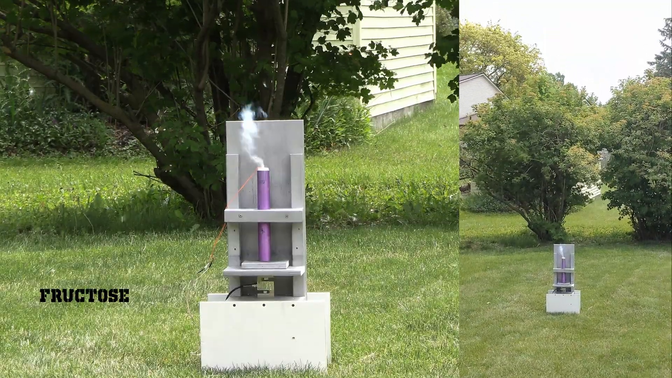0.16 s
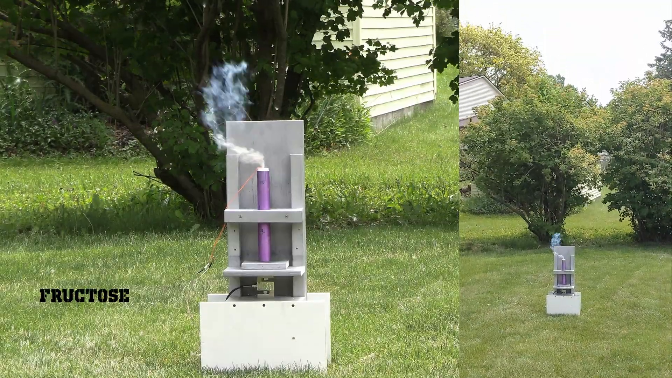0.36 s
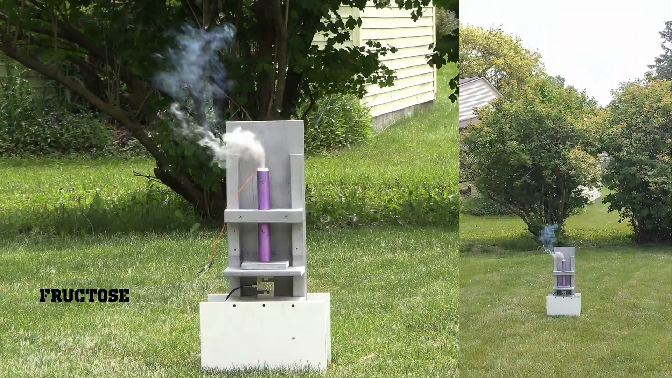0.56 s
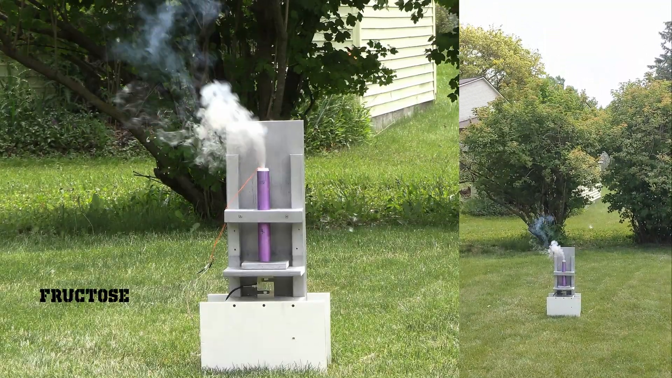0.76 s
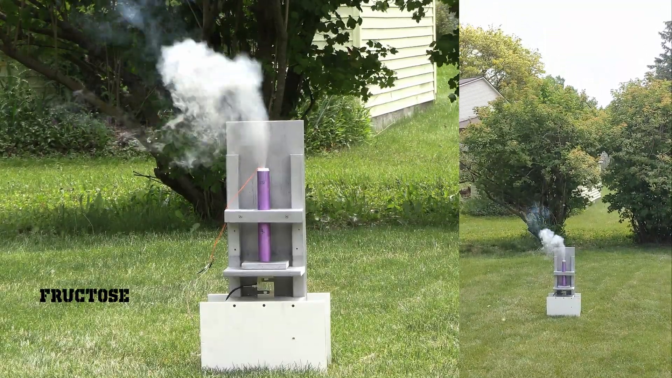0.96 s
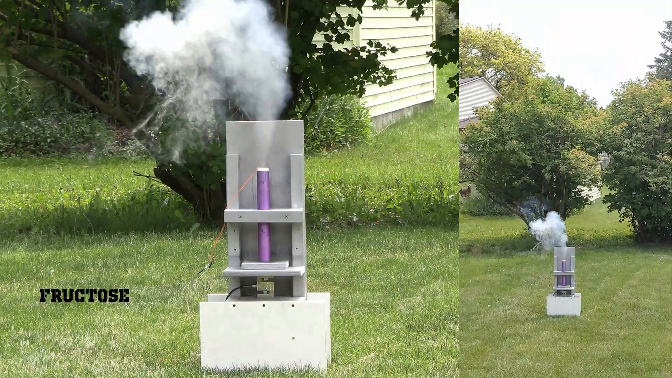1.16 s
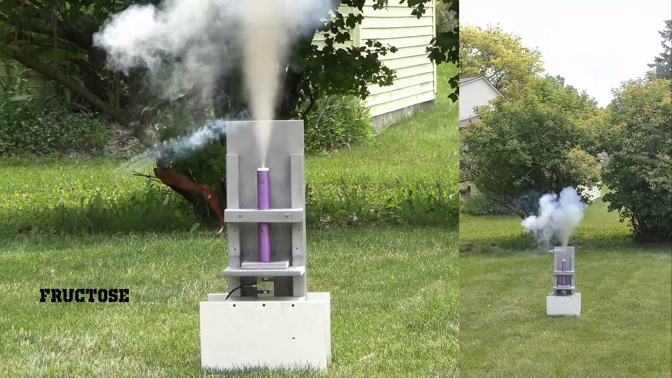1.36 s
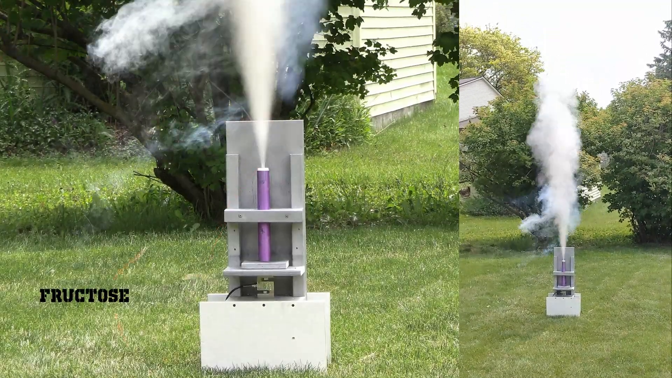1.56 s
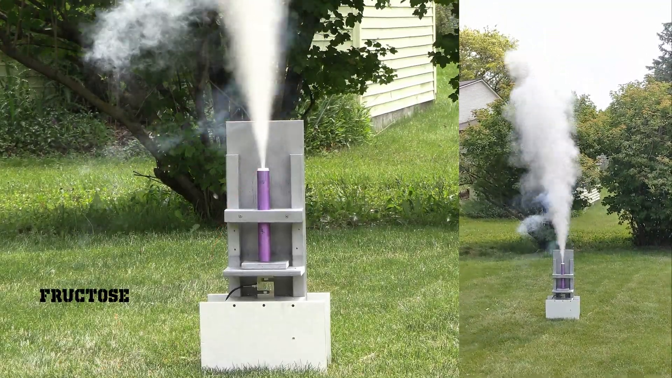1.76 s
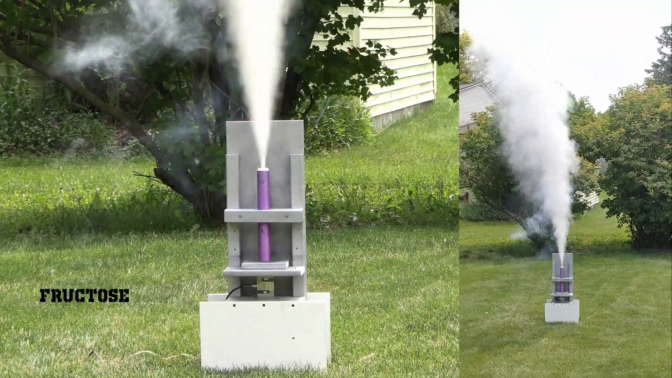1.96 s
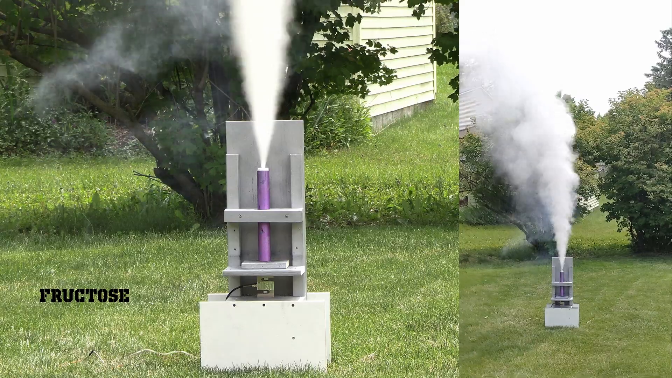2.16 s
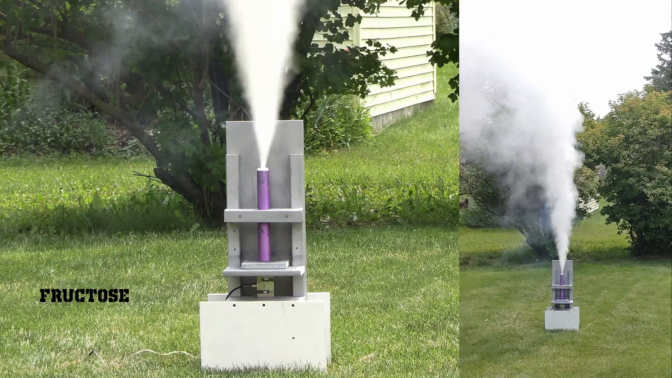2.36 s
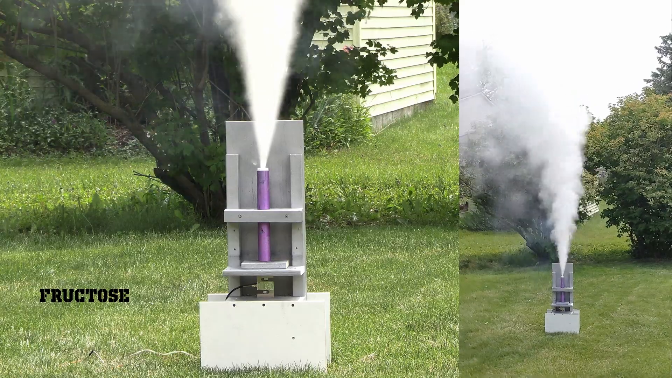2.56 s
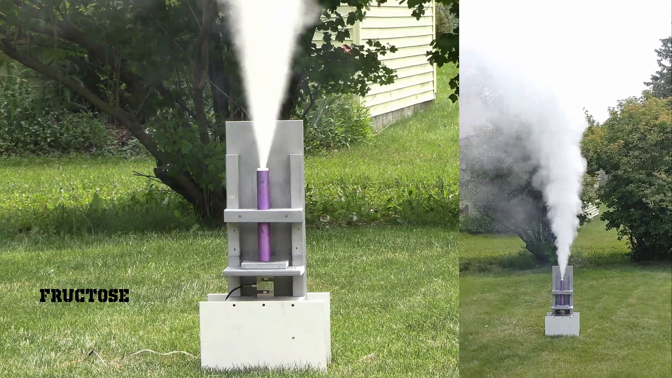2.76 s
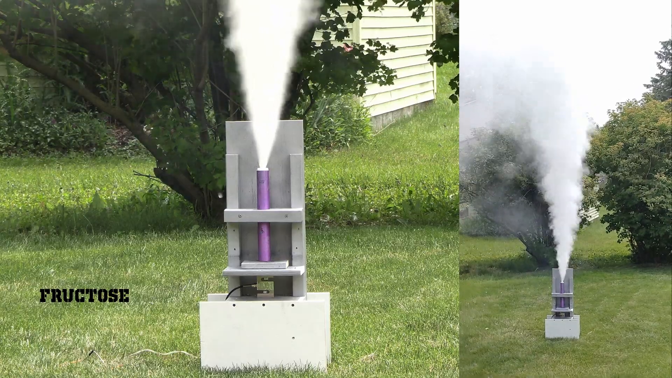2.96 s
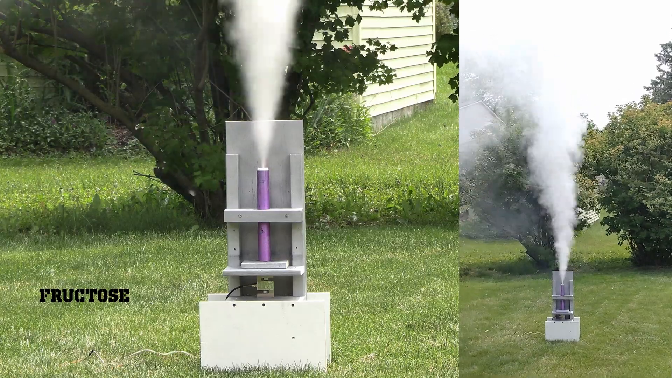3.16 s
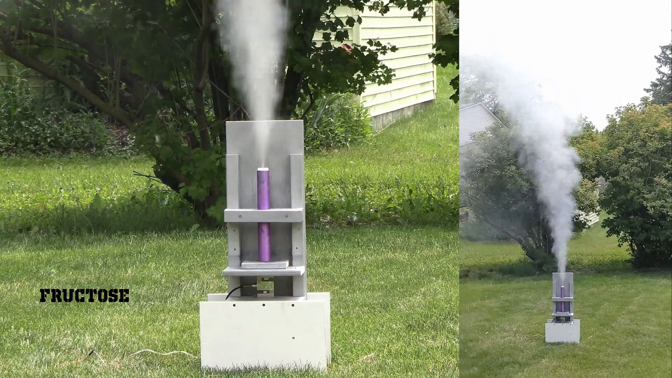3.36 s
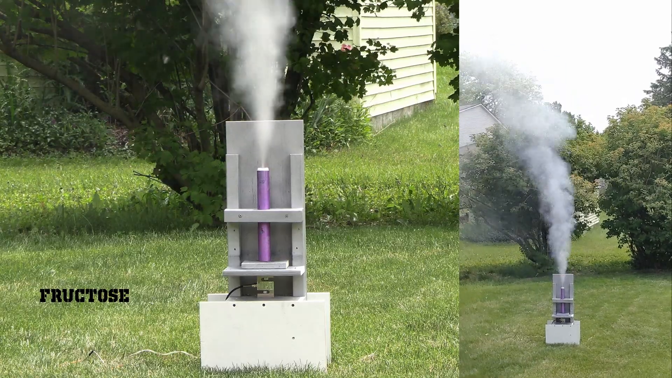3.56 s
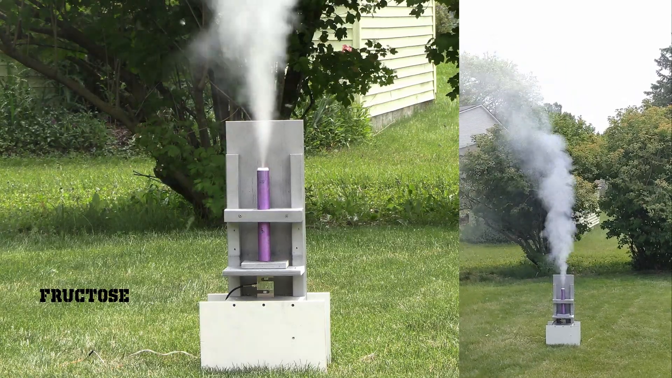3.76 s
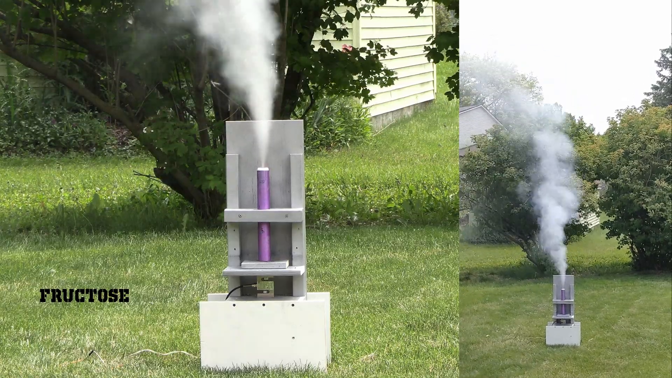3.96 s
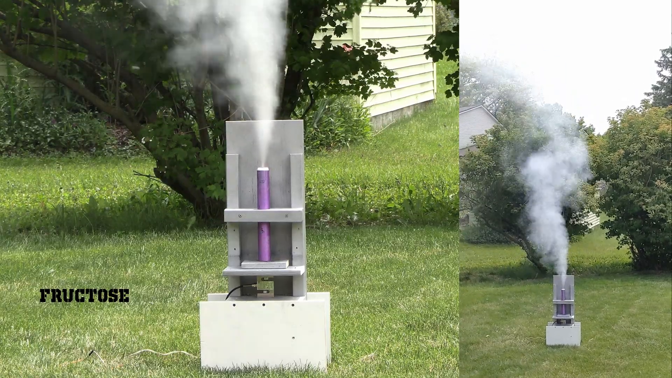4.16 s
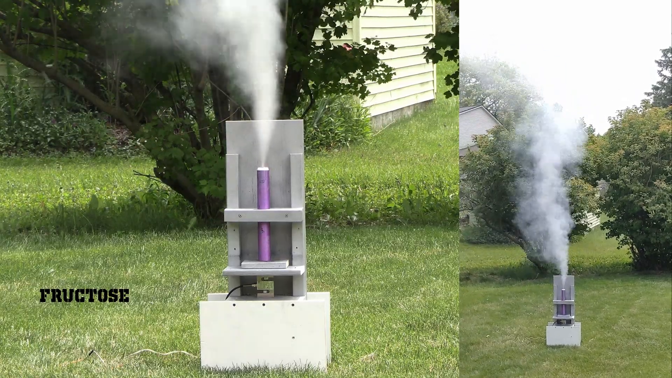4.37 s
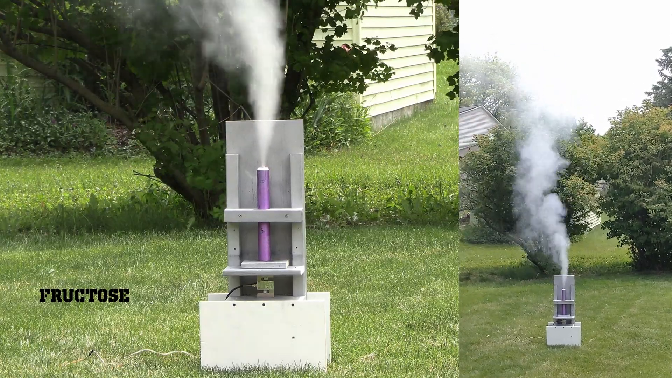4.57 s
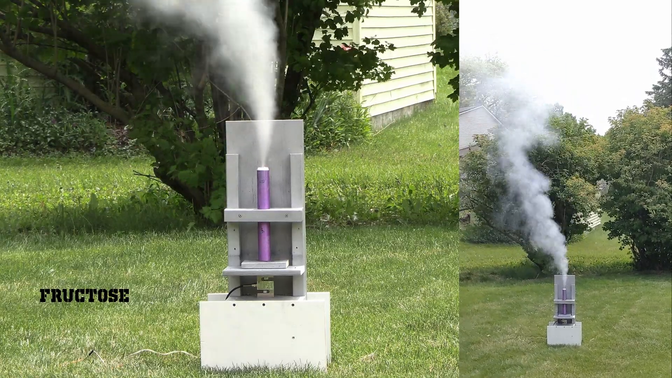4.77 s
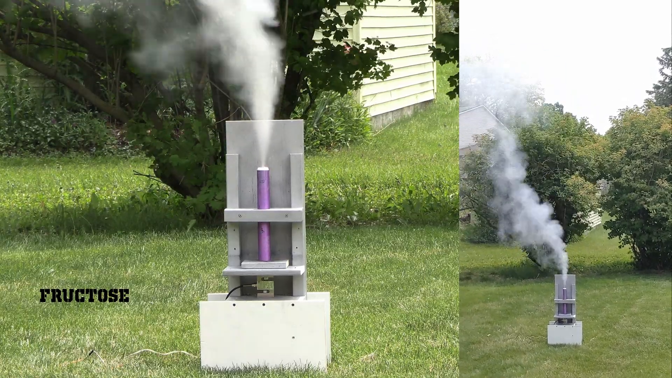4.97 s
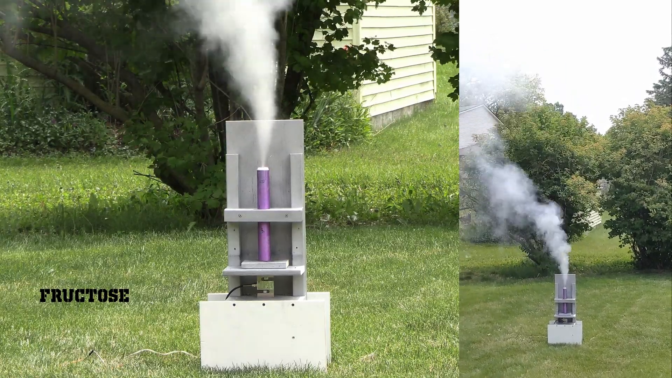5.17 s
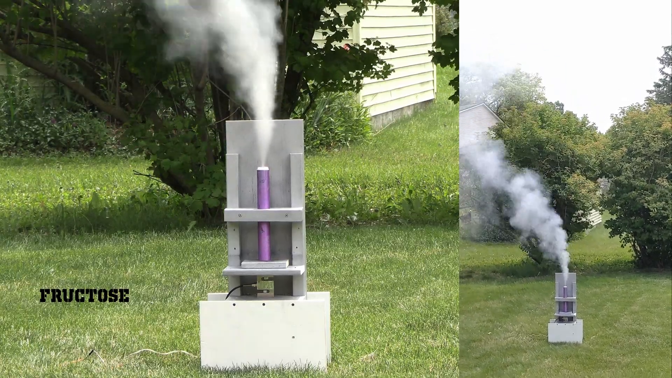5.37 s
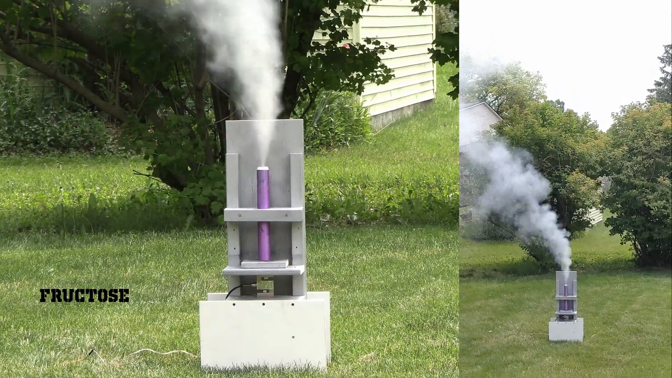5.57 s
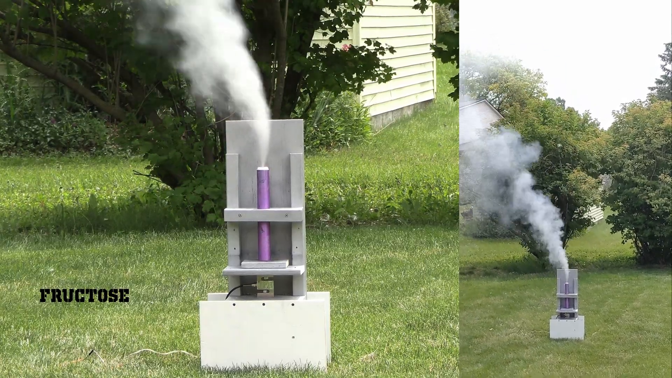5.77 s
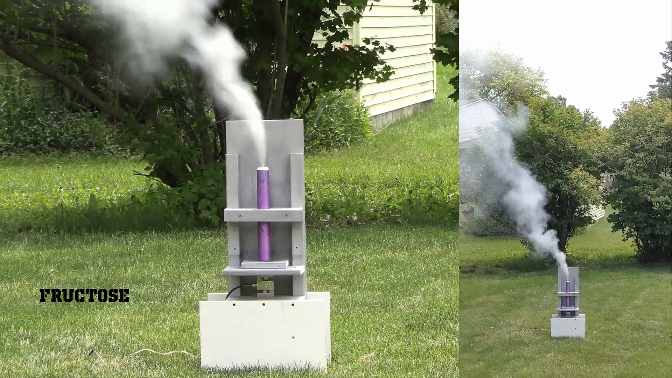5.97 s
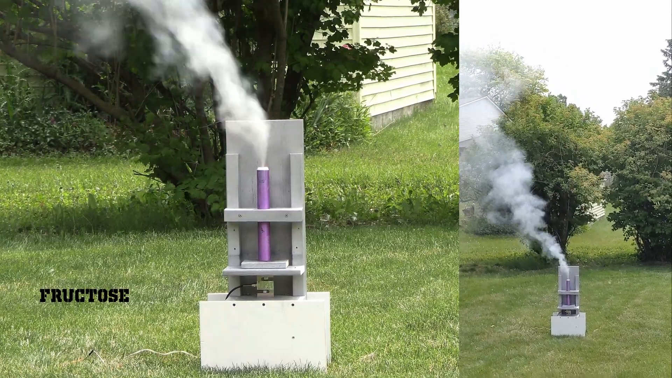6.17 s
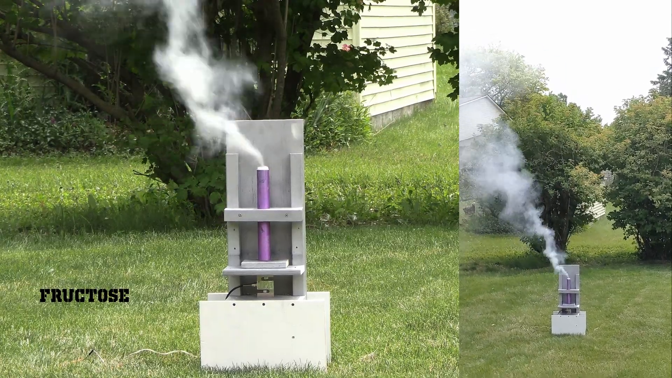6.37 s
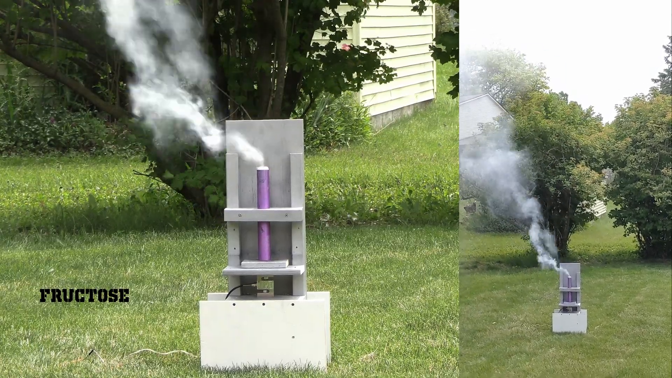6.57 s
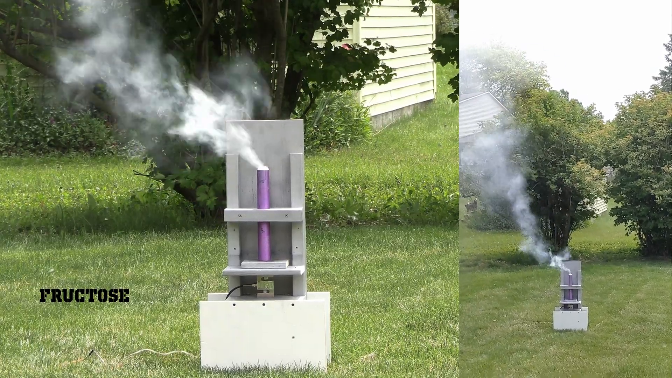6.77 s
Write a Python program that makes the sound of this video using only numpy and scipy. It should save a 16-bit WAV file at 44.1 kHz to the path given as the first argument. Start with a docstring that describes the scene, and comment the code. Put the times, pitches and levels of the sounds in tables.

```python
"""A small sugar rocket motor burns on a test stand on a lawn in a quiet garden, with wind on the microphone.
First the leaking gas fizzes and hoots: noise through resonances of the casing and the hollow core.
Then the nozzle chokes: white hiss, broadband jet roar and the sinking boom of the plume, for two seconds.
The pressure drains to a sputtering hiss with noise-burst spits and soft puffs of smoke.
The hiss dies away into gusts, the garden and a faint hum."""
import sys
import numpy as np
from scipy import signal
from scipy.fft import rfft, irfft
from scipy.io import wavfile
from scipy.ndimage import uniform_filter1d

SR = 44100
rng = np.random.default_rng(int(sys.argv[2]) if len(sys.argv) > 2 else 0)


def master(y):
    """Save y as 16-bit WAV."""
    cut = np.clip(np.atleast_2d(y).T, -1, 1)
    pcm = np.round(cut * 32767)  # scale
    wavfile.write(sys.argv[1], SR, pcm.astype(np.int16))


N = 300762
TIME = np.arange(N) / SR
# times and frequencies of the short-time spectra
FRAME_S = np.arange(N // 256 + 5) * 256 / SR
HZ = np.fft.rfftfreq(1024, 1 / SR)


def amp(db):
    """Level law: decibels to amplitude gain."""
    return 10 ** (np.asarray(db) / 20)


def evened(x):
    """Normalisation: scales to rms 1."""
    return x / np.sqrt(np.mean(x ** 2) + 1e-20)


def read(points, hz):
    """Spectral interpolation: a table read on a log-frequency axis."""
    table_hz, value = np.transpose(points)
    return np.interp(np.log(hz + 1), np.log(table_hz), value)


def track(rows, t):
    """Linear interpolation: the columns of a curve table at times t."""
    s, *columns = np.transpose(rows)
    return [np.interp(t, s, column) for column in columns]


def within(rows, fade=0.13):
    """Gating: 1 while a curve lasts, with Gaussian fades beyond its ends."""
    before = rows[0][0] - TIME
    after = TIME - rows[-1][0]
    outside = np.maximum(np.maximum(before, after), 0)
    return np.exp(-(outside / fade) ** 2)


def flutter(lo_hz, hi_hz):
    """Slow modulation: random wavering of rms 1 between two rates."""
    f = np.fft.rfftfreq(N, 1 / SR)
    band_gain = f / (f + lo_hz) / (1 + (f / hi_hz) ** 2)
    return evened(irfft(rfft(rng.standard_normal(N)) * band_gain, N))


def steady(colour):
    """Spectral shaping: stationary noise of rms 1 with a fixed spectrum."""
    gain = amp(read(colour, np.fft.rfftfreq(N, 1 / SR)))
    return evened(irfft(rfft(rng.standard_normal(N)) * gain, N))


def turbulence(shape, band, patchy_db):
    """Turbulence: noise with a moving spectrum and passing eddies, rms 1 inside the band."""
    re, im, eddies = rng.standard_normal((3, len(FRAME_S), len(HZ)))
    # an eddy spans neighbouring frames and frequencies
    eddies = uniform_filter1d(eddies, size=9, axis=0)
    eddies = evened(uniform_filter1d(eddies, size=16, axis=1))
    inside = (HZ >= band[0]) & (HZ <= band[1])
    level_shape = shape / np.linalg.norm(shape * inside, axis=1, keepdims=True)
    spectra = (re + 1j * im) * amp(patchy_db * eddies) * level_shape
    whole, part = (signal.istft(v.T, nperseg=1024, noverlap=768)[1][:N] for v in (spectra, spectra * inside))
    return whole / part.std()


def resonance(hz, width_hz):
    """Simple resonator: its gain at every frequency."""
    return 1 / np.sqrt(1 + ((HZ - hz ** 2 / (HZ + 1)) / width_hz) ** 2)


def bumps(modes, tuning=1):
    """Modal response: the sum of bell-shaped peaks and notches in dB."""
    return sum(db * np.exp(-((HZ - hz * tuning) / width) ** 2) for hz, width, db in modes)


def sing(hz, width_hz):
    """Noise-driven resonance: one gliding resonance of rms 1 inside 20-3000 Hz."""
    return turbulence(resonance(hz, width_hz) ** 2, band=(20, 3000), patchy_db=1.5)


def swells(rows, t):
    """Superposition: gain of Gaussian events, each with a centre_s, level_db and half_length_s."""
    return sum(amp(db) * np.exp(-((t - s) / length) ** 2) for s, db, length in rows)


def step(t, at, rise):
    """Sigmoid transition: a smooth step from 0 to 1."""
    return .5 + .5 * np.tanh(.5 * (t - at) / rise)


# spectrum of distant traffic and leaves: frequency_hz, density_db
GARDEN_COLOUR = [(20, -5), (60, -20), (110, -6), (180, -12.5), (480, -14.5), (650, -13.5), (1040, -13),
                 (1150, -18), (1760, -17.5), (2000, -22), (4400, -23), (6500, -26), (9000, -37.5),
                 (12000, -51), (15800, -49)]
# the faint, far-off hum: time_s, level_db, pitch_hz
HUM_TRACK = [(5.6, -68, 900), (6.2, -75, 950), (6.6, -67, 1030), (6.82, -71, 1030)]


def garden():
    """Stationary ambience: distant traffic and leaves rise slightly, and a narrow resonance hums far off."""
    hum_hz = track(HUM_TRACK, FRAME_S[:, None])[1]
    hum_gain = amp(track(HUM_TRACK, TIME)[0]) * within(HUM_TRACK, fade=.066)
    hum = sing(hum_hz, width_hz=80) * hum_gain
    ambience_db = np.interp(TIME, [1, 6], [-57, -55.3])
    return steady(GARDEN_COLOUR) * amp(ambience_db) + hum


# spectrum of wind buffeting the microphone: frequency_hz, density_db
BUFFET_COLOUR = [(10, -8), (25, 0.5), (42, 9.5), (65, -5.5), (105, -10), (160, -26.5), (260, -34),
                 (900, -65)]
# gusts on the microphone: centre_s, level_db, half_length_s
GUST_EVENTS = [(.1, -55, 0.34), (.455, -38.5, .022), (.59, -45, .07), (.74, -34, 0.045),
               (.87, -40.5, 0.053), (.965, -30, 0.012), (1.03, -39, .025), (1.11, -37.5, 0.021),
               (1.2, -45, 0.24), (5.42, -53, .11), (5.63, -51.5, 0.19), (6.27, -56.5, 0.17),
               (6.64, -49, 0.13)]
BREEZE_DB = -12  # the softer, higher flutter around each gust, against the smoothed gusts


def wind():
    """Pressure fluctuation: gusts buffet the microphone before and after the burn, amid a softer flutter."""
    gusts = swells(GUST_EVENTS, TIME)
    buffet = steady(BUFFET_COLOUR)
    # level the noise so that the gusts alone set its loudness
    local_rms = np.sqrt(uniform_filter1d(buffet ** 2, size=3000))
    breeze = steady([(20, -1), (60, -1), (100, 3), (140, -5.5), (250, -27), (900, -60)])
    return buffet / local_rms * gusts + breeze * amp(BREEZE_DB) * uniform_filter1d(gusts, size=16000)


# soft puffs of smoke as the grain burns out: centre_s, level_db, half_length_s
PUFF_EVENTS = [(3.61, -45, .025), (3.752, -44, 0.019), (4.05, -52.5, 0.017), (4.24, -48, 0.029),
               (4.475, -48, 0.022), (4.58, -46, 0.014), (4.647, -45, 0.013), (4.82, -41, .012),
               (4.855, -44, 0.021), (4.96, -46.5, .02), (5.09, -51, .03)]


def puffs():
    """Pulsed low-frequency noise: lumps of smoke leave the nozzle with a low flutter."""
    air = steady([(50, -20), (120, -7.5), (230, -1.5), (360, 3.5), (520, -7.5), (800, -1), (1500, -20),
                  (4000, -50)])
    return air * swells(PUFF_EVENTS, TIME)


# spits of the dying grain: start_s, level_db (before the envelope shape), decay_s
SPIT_EVENTS = [(3.396, -42, 0.0033), (3.407, -40, 0.004), (3.417, -41, .003), (5.523, -34, .004),
               (5.545, -26, 0.0045), (5.558, -37, .004), (5.591, -28, .006), (5.684, -35, .004)]


def spits():
    """Impulsive noise: bits of slag leave the nozzle as short puffs with a quick rise and decay."""
    puff = steady([(200, -32), (700, 1.5), (1400, -13), (2200, 8.0), (3000, 1.5), (4100, 8.0), (7000, -34),
                   (15000, -48)])
    envelope = np.zeros(N)
    for s, db, decay in SPIT_EVENTS:
        age = np.maximum(TIME - s, 0) / decay
        envelope += amp(db) * 2 * np.sqrt(age) * np.exp(-age)
    return puff * envelope


# the igniter spurts: centre_s, level_db, half_length_s
SPURT_EVENTS = [(0.0, -57, .03), (.058, -53.5, 0.032), (.162, -50.5, 0.03), (.225, -61.5, .06)]
# then the grain catches and leaks ever more gas, until the nozzle hiss takes over
LEAK_DB, LEAK_DB_PER_S, HANDOVER_S, HANDOVER_FADE_S = -66.5, 16, 1.21, 0.11  # LEAK_DB is at time 0


def leak(t):
    """Source strength: gain of the gas that escapes at ignition, in spurts and a growing stream."""
    stream = amp(LEAK_DB + LEAK_DB_PER_S * t) * (1 - step(t, HANDOVER_S, HANDOVER_FADE_S))
    return swells(SPURT_EVENTS, t) + stream


# the whistle of the casing at ignition: time_s, pitch_hz
WHISTLE_TRACK = [(0, 2170), (.12, 2240), (.19, 2450), (.26, 2190), (.42, 2070), (.62, 2210), (1.05, 2340)]
# spectrum of the gas that leaks out at ignition: frequency_hz, density_db
LEAK_COLOUR = [(500, -25), (1200, -9), (1900, 1), (3000, 0), (4500, -5), (6200, 4.5), (7200, -3),
               (8300, -3), (9500, -15), (11500, -21), (15800, -28)]
# peaks and notches of the nozzle and stand, before weighting: frequency_hz, width_hz, gain_db
STAND_MODES = [(4420, 150, -5), (4960, 260, 6), (6400, 300, 1.5), (7250, 260, -3), (8150, 520, 5.5),
               (10450, 450, 2.5), (12400, 300, 2.5), (13350, 280, -2.5), (14250, 450, 4.5)]


def fizz():
    """Pipe resonance and overblowing: the first gas sings in the casing, a stronger leak adds a second mode."""
    t = FRAME_S[:, None]
    pipe_hz, = track(WHISTLE_TRACK, t)
    overblow = np.minimum(leak(t) / amp(-51), 1)
    first_db = 18 / (1 + ((HZ - pipe_hz) / 150) ** 2)
    second_db = 12 * overblow / (1 + ((HZ - 1.62 * pipe_hz) / 160) ** 2)
    colour_db = read(LEAK_COLOUR, HZ) + first_db + second_db + 0.6 * bumps(STAND_MODES)
    return turbulence(amp(colour_db), band=(1900, 2700), patchy_db=2.0) * leak(TIME)


# the core rises as it warms: pitch at time 0 under a 2200 Hz whistle, its rise, level against the leak
HOOT_HZ, HOOT_HZ_PER_S, HOOT_DB = 520, 110, -5.5


def hoot():
    """Bottle resonance: the leak drives the hollow core, whose pitch bends with the whistle."""
    t = np.minimum(FRAME_S[:, None], CHOKE_S)
    bend = (track(WHISTLE_TRACK, t)[0] / 2200) ** 1.6
    core_hz = (HOOT_HZ + HOOT_HZ_PER_S * t) * bend
    return sing(core_hz, width_hz=170) * amp(HOOT_DB) * leak(TIME)


# burnout: when the pressure lets go, and its decay time
BURNOUT_S, DRAIN_S = 3.3, .13


def drained(t):
    """Exponential discharge: share of the pressure that is left after burnout."""
    return np.exp(-np.maximum(t - BURNOUT_S, 0) / DRAIN_S)


# the nozzle chokes quickly, then the pressure creeps up to full
CHOKE_S, CHOKE_RISE_S, CREEP_SHARE, CREEP_S = 1.39, 0.023, 0.21, 0.88
UNCHOKED_SHARE = 0.086  # the share of choked flow that never goes


def choked(t):
    """Choked flow: how fully the nozzle is choked, 0-1."""
    creep = 1 - CREEP_SHARE * np.exp(-np.maximum(t - CHOKE_S, 0) / CREEP_S)
    return np.clip(UNCHOKED_SHARE + 0.82 * step(t, CHOKE_S, CHOKE_RISE_S) * creep * drained(t), 0, 1)


# the boom of the smoke column: time and level of its peak, then the slopes before and after
PLUME_S, PLUME_DB, PLUME_RISE_DB_PER_S, PLUME_FALL_DB_PER_S = 1.455, -30.5, 120, 13
# its pitch at the peak, the pitch it sinks toward, and the time constant
PLUME_PEAK_HZ, PLUME_END_HZ, PLUME_SINK_S = 220, 70.4, 0.73


def plume_hz(t):
    """Length scaling: the taller the smoke column, the lower its largest eddies sound."""
    age = np.maximum(t, CHOKE_S) - PLUME_S
    return PLUME_END_HZ + (PLUME_PEAK_HZ - PLUME_END_HZ) * np.exp(-age / PLUME_SINK_S)


def plume():
    """Large-scale turbulence: the boom of the growing smoke column swells fast, then fades as it sinks."""
    centre_hz = plume_hz(FRAME_S[:, None])
    shape = resonance(centre_hz, width_hz=0.98 * centre_hz) ** 2
    boom = turbulence(shape, band=(20, 1000), patchy_db=2.0)
    age = TIME - PLUME_S
    swell_db = np.minimum(PLUME_RISE_DB_PER_S * age, -PLUME_FALL_DB_PER_S * age)
    return boom * drained(TIME) * amp(PLUME_DB + swell_db)


# gas flow through the nozzle: time_s, level_db (before trim and flutter)
FLOW_TRACK = [(0.85, -64), (0.86, -65.5), (1.19, -43), (1.25, -37), (1.37, -29), (1.99, -27.5),
              (2.4, -27.5), (3.07, -27), (3.35, -31), (3.6, -28.5), (3.85, -30), (4.37, -28.5), (5.12, -29),
              (5.59, -33), (6.17, -51.5), (6.4, -67.5)]
# spectrum of the soft hiss: frequency_hz, density_db
SOFT_COLOUR = [(300, -32), (1200, -14), (1700, -4.5), (2800, -1), (3400, 1), (4500, -2), (6500, -3),
               (7300, -7), (9500, -12.5), (12000, -18), (15800, -23)]
# spectrum of choked flow: frequency_hz, density_db
CHOKED_COLOUR = [(300, -75), (1500, 1), (2800, 1), (3600, 1), (4400, -2.5), (5500, 0.5), (7200, -4),
                 (9500, -3.5), (12000, -2), (15800, -2.5)]
# pipe resonances of the casing, before tuning and ringing: frequency_hz, width_hz, gain_db
PIPE_MODES = [(2248, 230, 8), (4110, 370, 3.5), (5740, 470, 2.5)]
# below this level the hiss is darker, and the casing's pitch sags by a share for every 20 dB
QUIET_HISS_DB, SAG_SHARE = -37, 0.053
# the casing rings most when nearly empty: factor on its dB, extra at the peak, peak time, half length
RING_REST, RING_EXTRA, RING_S, RING_LENGTH_S = 0.63, 1.45, 5.7, 0.7


def hiss():
    """Nozzle flow noise: slow gas rings the casing, choked gas damps the ringing and turns white."""
    t = FRAME_S[:, None]
    choke = choked(t)
    quiet_db = np.maximum(QUIET_HISS_DB - track(FLOW_TRACK, t)[0], 0)
    ringing = RING_REST + RING_EXTRA * np.exp(-((t - RING_S) / RING_LENGTH_S) ** 2)
    tuning = .99 - SAG_SHARE * quiet_db / 20
    colour_db = (1 - choke) * read(SOFT_COLOUR, HZ) + choke * read(CHOKED_COLOUR, HZ)
    colour_db = colour_db + ringing * (1 - .7 * choke) * bumps(PIPE_MODES, tuning)
    colour_db = colour_db + (1 - 0.63 * choke) * bumps(STAND_MODES)
    # the quiet hiss is darker at the top
    quiet_tilt = read([(1200, 0), (1750, 0.5), (2800, -0.03), (6300, -0.1), (8300, -0.091), (11000, -0.52),
                       (15800, -0.6)], HZ)
    colour_db = colour_db + quiet_db * quiet_tilt
    gas = turbulence(amp(colour_db), band=(3000, 9000), patchy_db=0.61)
    # the level wavers less under choked flow and more near the end
    unsteady_db = .55 - 0.4 * choked(TIME) + .45 * step(TIME, at=5.1, rise=.1)
    level_db = track(FLOW_TRACK, TIME)[0] + unsteady_db * flutter(lo_hz=7.1, hi_hz=110) - 0.44
    return gas * amp(level_db) * within(FLOW_TRACK, fade=0.067)


# turbulent mixing of the jet: time_s, level_db (before sputter and slack)
ROAR_TRACK = [(1.2, -64), (1.37, -46), (1.41, -29), (1.49, -26.5), (2.1, -25), (2.74, -27.5), (3.37, -24),
              (3.48, -31.5), (3.87, -39.5), (4.85, -37.5), (5.0, -38.5), (5.14, -37), (5.45, -39.5),
              (5.9, -54.5)]
# spectrum of the mixing jet: frequency_hz, density_db
JET_COLOUR = [(20, -12), (70, -18.5), (140, -12.5), (260, -6), (470, -8.5), (750, -3), (1100, -3.5),
              (1700, -0.5), (2250, 0), (2600, -4.5), (3100, -13), (4200, -20), (8000, -42)]
# the young jet roars thinner, the draining jet deeper; without pressure behind it the roar loses bass
# (each dB is weighted over frequency below)
YOUNG_JET_DB, YOUNG_JET_S, DRAINING_BODY_DB, SLACK_BASS_DB = -7, 0.9, 8, -12.5


def roar():
    """Jet mixing noise: eddies no larger than the plume roar, and sputter once the pressure has fallen."""
    t = FRAME_S[:, None]
    youth = np.exp(-((t - CHOKE_S) / YOUNG_JET_S) ** 2)
    young_db = YOUNG_JET_DB * step(t, CHOKE_S, CHOKE_RISE_S) * youth
    bass_db = SLACK_BASS_DB * step(t - BURNOUT_S, at=.08, rise=0.12) + young_db + 2.0
    # the body peaks midway through the pressure drop
    body_db = young_db + DRAINING_BODY_DB * np.sin(np.pi * drained(t))
    bass_weight = read([(60, 5.7), (150, 0.99), (450, 0.67), (700, 0.075)], HZ)
    body_weight = read([(450, 0.42), (700, 0.71), (1000, 0.54), (1400, 0.16)], HZ)
    colour_db = read(JET_COLOUR, HZ) + bass_db * bass_weight + body_db * body_weight
    # the plume's size limits the lowest frequencies
    size_limit = 1 / (1 + (0.37 * plume_hz(t) / (HZ + 1)) ** 2)
    eddies = turbulence(amp(colour_db) * size_limit, band=(600, 1700), patchy_db=1.0)
    slack = 1 - choked(TIME)
    sputter_db = (0.24 + 1.9 * slack) * flutter(lo_hz=5.1, hi_hz=90)
    return eddies * amp(track(ROAR_TRACK, TIME)[0] + sputter_db - 1.5 * slack) * within(ROAR_TRACK)


def scene():
    """Superposition: everything arrives from straight ahead, alike in both channels."""
    motor = puffs() + spits() + fizz() + hoot() + plume() + hiss() + roar()
    mono = garden() + wind() + motor
    return np.array([mono, mono])


def record(dry):
    """Saturation and band limiting: the highest peaks are rounded off, then a low-pass removes the top."""
    ceiling, edge_hz = 0.27, 15800
    rounded = dry / (1 + (dry / ceiling) ** 4) ** (1 / 4)
    low_pass = signal.firwin(1023, edge_hz, window=("kaiser", 9), fs=SR)
    return signal.oaconvolve(rounded, low_pass[None], "same")


dry = scene()
out = record(dry)
master(out)
```